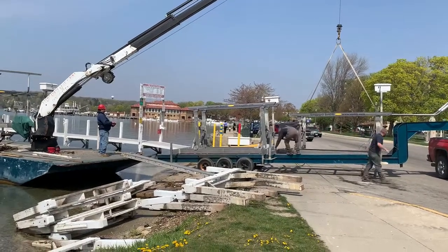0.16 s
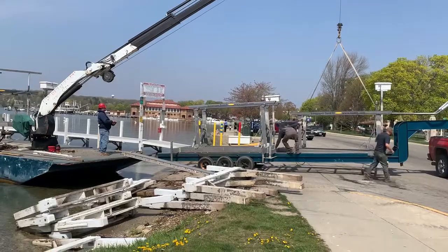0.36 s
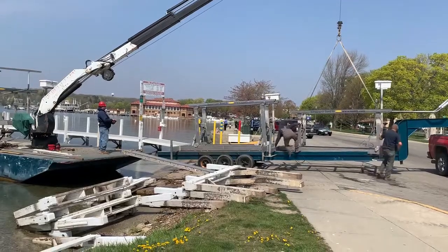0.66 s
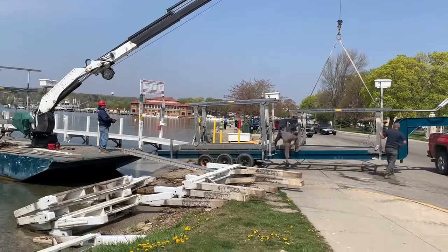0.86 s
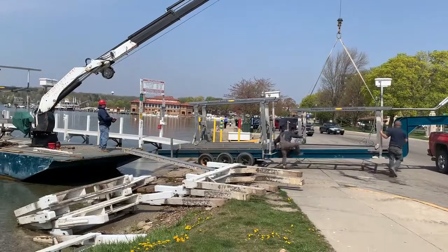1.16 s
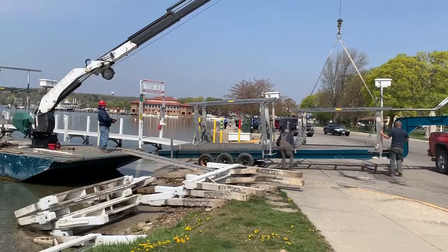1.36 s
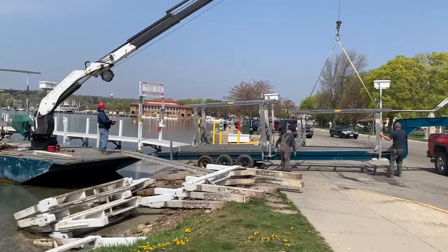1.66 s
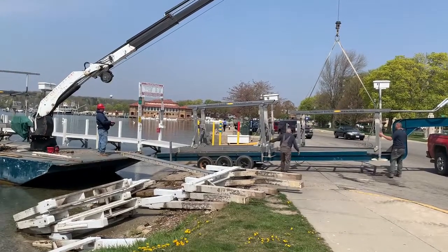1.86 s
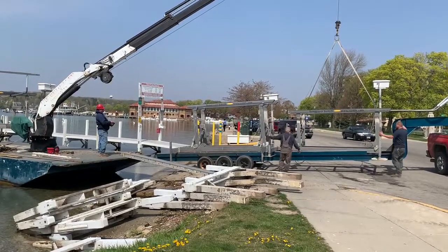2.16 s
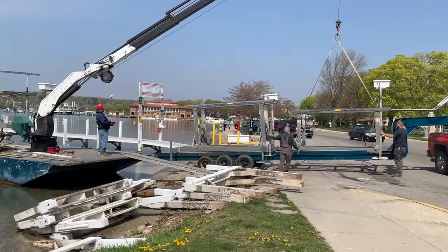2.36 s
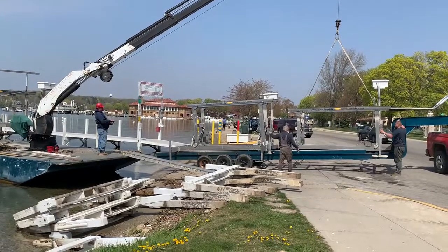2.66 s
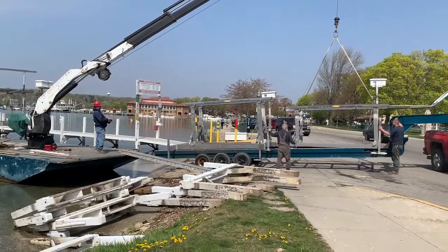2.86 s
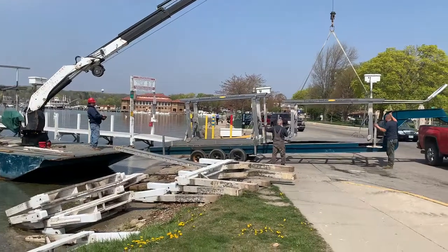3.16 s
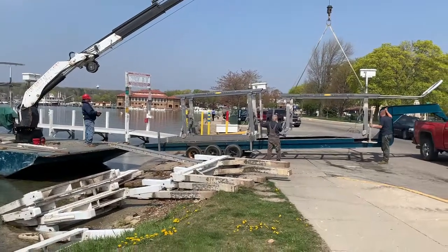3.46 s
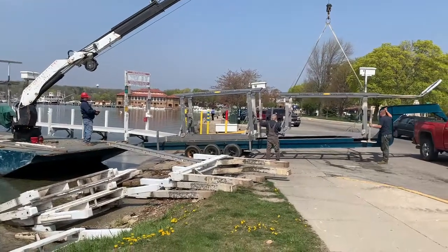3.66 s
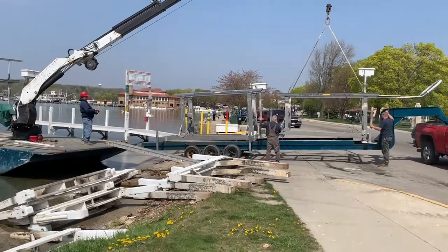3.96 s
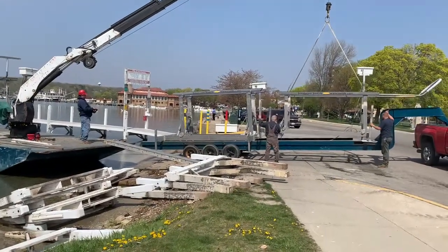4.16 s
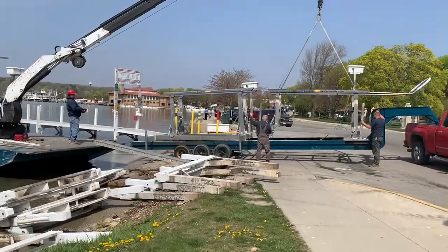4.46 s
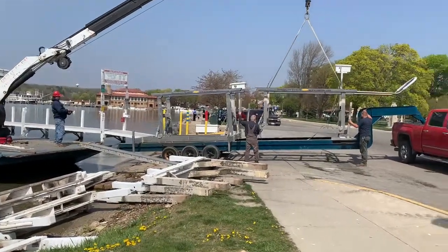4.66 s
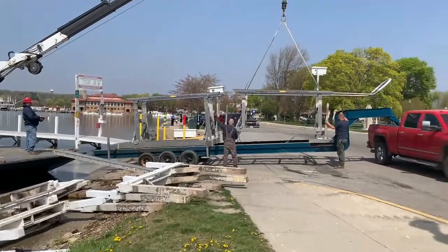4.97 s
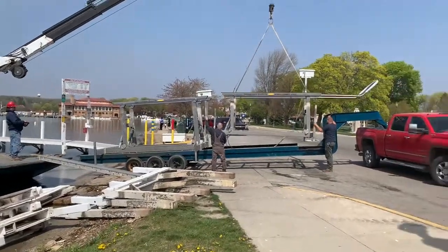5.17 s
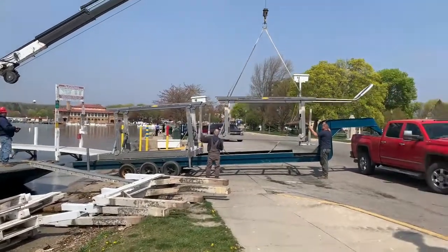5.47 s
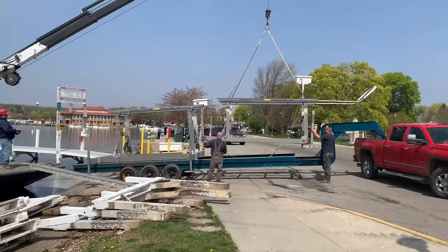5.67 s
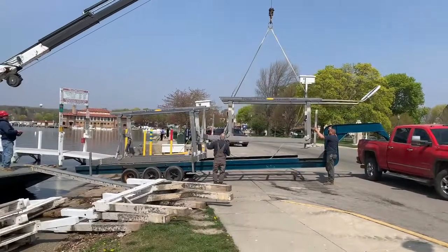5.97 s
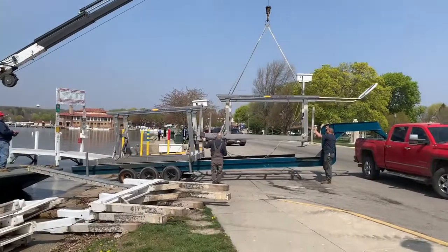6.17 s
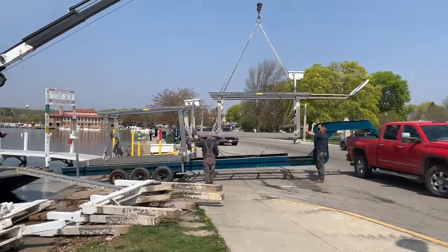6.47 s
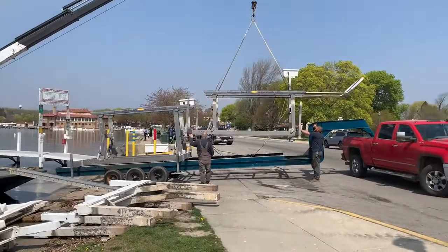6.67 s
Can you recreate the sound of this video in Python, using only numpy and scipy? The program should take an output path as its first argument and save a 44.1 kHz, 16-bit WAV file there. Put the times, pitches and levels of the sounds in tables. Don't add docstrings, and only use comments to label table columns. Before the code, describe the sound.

A mid-pitched pump whine rides on a low diesel hum and broad mechanical rush, briefly dipping near one second and growing fuller afterward. Light metal ticks and dull sling knocks precede a heavier bouncing frame clunk. Bright hard clanks follow while a car's road noise swells, with low boom and thumping exhaust at the end. Open-air wide stereo, moderate distance, little reverberation.

```python
import sys
import numpy as np
from scipy import signal
from scipy.fft import rfft, irfft, next_fast_len
from scipy.io import wavfile

SR = 44100
rng = np.random.default_rng(int(sys.argv[2]) if len(sys.argv) > 2 else 0)


def bounce(signal):
    frames = np.transpose(np.atleast_2d(signal))
    limited = np.clip(frames, -1, 1)
    pcm = np.round(limited * 32767).astype(np.int16)
    wavfile.write(sys.argv[1], SR, pcm)


def boost_factor(decibels):
    exponent = np.asarray(decibels, float) / 20
    return 10 ** exponent


N = 301203

# time_s, load_db (rms of second multiple), ripple_sharpness_db, tank_drumming_db
PUMP = [(0, -43, -7, 3.5), (.15, -38, -9, -7.5), (.87, -37.5, -2, -1.5), (.95, -58, 4.5, 10),
        (1.04, -42.5, -11, -3), (1.45, -41, -9, -5), (1.75, -39, -6, -21), (2.02, -35, -0.5, -10),
        (2.2, -33, -1.5, -1), (2.8, -33.5, -2, -1.5), (3.25, -34.5, -3.5, -1), (3.7, -37.5, -0.5, -11),
        (4.2, -36, -1, -3), (4.75, -35, -5, 0.5), (5.05, -34, -1, 0.5), (5.7, -38, 0.5, 1.5),
        (6.3, -43, 1, 1), (6.83, -49.5, 3.5, 15.5)]
# time_s, piston_rate_hz
SPEED = [(0, 265.6), (.31, 265.8), (.65, 265.1), (.88, 266.2), (.98, 263.5), (1.1, 266.4), (1.27, 266.8),
         (1.55, 266.2), (2.17, 264), (2.55, 263.9), (3.6, 265), (4.34, 264.3), (5.5, 264.9), (6.83, 265)]
# multiple, left_over_right_db, right_lag_rad
PUMP_TONES = [(1, -1.5, 0.31), (2, 5, 1.23), (3, 3, 0.15)]
# multiple, level_db (re the last PUMP_ANSWER row), drumming_share, right_lag_rad
PUMP_FAINT = [(7, -12, .01, 0.076), (10, -15.5, 0.93, 0.82), (11, -11.5, .01, -0.52)]
# mean_level_db, load_share, sharpness_share, drumming_share, waver_db
PUMP_ANSWER = [(-39.5, 0.55, .01, 1, 1.5), (-35, 0.89, .01, .01, 0.36), (-37, 0.66, 1.44, .01, -0.14),
               (-55.5, 1, 0.16, .01, 4)]
FLUTTER_DB, FLUTTER_GROWS_PER_S, STEADIEST_S = 1.5, 0.37, 2.5
# order, level_db (rms)
ORDERS_DB = [(3, -52), (4, -31.5), (5, -50), (6, -48), (7, -47.5), (8, -43), (10, -55.5), (11, -53.5),
             (12, -52.5), (15, -55), (16, -52.5), (18, -57), (20, -59)]
PISTONS_PER_ORDER, FIRING_ORDER = 14, 4
# time_s, level_db (re mean)
FIRING = [(0, -16), (.15, 5.5), (.5, -4), (.95, 1), (2.2, -3.5), (3.2, 0), (3.7, -2.5), (4.2, -5.5),
          (5.2, -3.5), (5.7, -1), (6.2, -9), (6.45, 9.5), (6.83, -10)]
# start_s, highest_db
FIRING_YIELDS = (6.2, -12)
# multiple (of piston rate), start_s, end_s, level_db (rms), right_lag_rad
WHINES = [(5, .4, .8, -55, 1.2), (5, 1.9, 3.3, -51.5, 1.2), (5, 3.5, 4.75, -54, 1.5),
          (4.857, .3, .85, -55, 1.1), (4.857, 1.8, 3.3, -54, 1.3), (4.857, 5.1, 5.8, -52.5, 1.8),
          (5.46, .1, 1.75, -56, 2.4), (4.66, .3, 1.0, -56, 1.0), (4, 1.45, 1.85, -57, .5),
          (4, 2.3, 3.55, -53, .3), (4, 4.0, 4.75, -53, .3), (4, 5.4, 6.2, -53, .3), (4, 6.4, 6.75, -54, .3),
          (10, 5.55, 6.08, -59, .3), (4.66, 6.35, 6.72, -51, 1.0)]
WHINE_FADE_DB_PER_S, WHINE_TRIM_DB = 83, 1.5

# frequency_hz, density_db (per Hz)
RUMBLE = [(15, -60), (27, -49.5), (50, 3.5), (81, 6.5), (119, -1), (155, 2), (203, -7), (252, -3.5),
          (450, -17), (580, -20), (990, -120)]
# frequency_hz, density_db (per Hz)
RUSH_COLOUR = [(250, 4.5), (400, -1), (900, 2), (1350, -2), (1900, -3.5), (2600, -11), (3300, -14.5),
               (4500, -18.5), (6500, -29), (8500, -42), (11500, -59), (14200, -31), (15100, -43),
               (15400, -73)]
# frequency_hz, likeness (0-1)
RUSH_ALIKE = [(60, 0.93), (350, 0.9), (800, 0.85), (1100, 0.26), (1700, 0.28), (2400, 1), (3400, 0.31),
              (5500, 0.45)]
# frequency_hz, width_hz, level_db, change_db_per_s
CASE = [(1288, 89, -2.5, 0.2), (2490, 196, -9.5, 1.86), (3100, 280, 2, -3), (2456, 45, -3, 0.3),
        (2620, 26, -2, 2.3), (2810, 45, -5, 2), (2900, 40, -1, 0)]
RUMBLE_DB, RUSH_DB, RUSH_FOLLOWS_LOAD, RUSH_RISE_DB_PER_S = -33, -37.5, 0.085, 0.26
TREBLE_FROM_HZ, TREBLE_FOLLOWS_LOAD = 2500, 0.35
CRANE_LAG_S = 13.07 / 44100
# start_s, end_s, pitch_hz, level_db
GROAN = (.08, .52, 214.5, -36)
GROAN_SAG_FROM_S, GROAN_SAG_HZ_PER_S = .24, 68
GROAN_IN_DB_PER_S, GROAN_OUT_DB_PER_S = 170, 280

# frequency_hz, level_db, width_hz, t60_s
FRAME = [(288.8, 4.5, 97, 0.39), (639, -0.5, 182, 0.24), (465, -3.5, 370, 0.42), (940, -6.5, 590, 0.5),
         (1900, -13, 1100, 0.26), (4330, -17.5, 3000, 0.32), (6520, -20, 4200, 0.25),
         (9800, -15, 2900, 0.12)]
# start_s, level_db, tilt_above_db_per_octave, tilt_below_db_per_octave
FRAME_BLOWS = [
    (3.214, -25, -6, -11),
    (3.227, -33.5, 2.5, 0),
    (3.245, -35, 1.5, -13),
    (3.262, -35, 0, -11),
    (3.284, -35, -1, -1),
]
# start_s, peak_db, pitch_hz, width_hz, t60_s
SIDE_KNOCKS = [
    (1.14, -29, 460, 40.4, 0.2),
    (3.472, -19, 670, 303, 0.063),
    (3.735, -25, 670, 150, 0.076),
]
# start_s, peak_db, pitch_hz, width_hz, t60_s
CLANKS = [(4.552, -33, 1880, 120, .05), (4.552, -31, 2450, 150, .05), (4.552, -40, 4230, 1500, .025),
          (4.9665, -26, 4330, 250, 0.024), (4.967, -30, 3540, 200, .035), (4.968, -26, 2050, 150, .04),
          (4.967, -27, 2570, 300, .05), (4.9665, -35, 7340, 500, .03), (4.9665, -36, 10700, 700, .022),
          (4.9665, -41, 5940, 1800, .025), (4.988, -24, 1900, 140, 0.044), (4.988, -29, 2500, 400, .02),
          (4.991, -27, 1690, 100, 0.046), (4.988, -37, 4060, 1500, 0.035), (6.1255, -28, 5370, 450, 0.025),
          (6.1255, -26, 1870, 100, .06), (6.128, -25, 2283, 100, 0.06), (6.128, -34, 2503, 120, .068),
          (6.126, -33, 1450, 200, .04), (6.1275, -30.5, 4260, 450, 0.057), (6.1255, -41, 6600, 600, .03),
          (6.1255, -39, 7450, 500, .02), (6.1255, -45, 11700, 800, .014), (6.1255, -43, 9600, 1500, .025),
          (6.1255, -48, 13800, 2500, .015), (6.144, -42, 4300, 400, .04), (6.144, -45, 6500, 1800, .04),
          (6.163, -39, 2120, 40, 0.21)]
# start_s, peak_db, pitch_hz, width_hz, t60_s
OPPOSED = [
    (4.552, -22, 1400, 250, .05),
    (4.552, -33, 3300, 250, .04),
    (4.552, -35, 1800, 300, .04),
    (4.967, -33, 2670, 300, .04),
    (4.967, -33, 3400, 300, .03),
    (4.989, -33, 1770, 300, .04),
    (6.126, -26, 2850, 200, .06),
    (6.126, -31, 1430, 200, .05),
    (6.126, -36, 3350, 300, .04),
]
# start_s, peak_db,
# pitch_hz, width_hz, t60_s
CRACKS = [(4.9665, -33, 3480, 5000, 0.015), (4.988, -35, 2440, 2500, .02), (6.1255, -35, 3690, 5500, 0.021),
          (6.132, -37, 4460, 4000, 0.043), (1.366, -45, 2000, 1500, 0.024), (1.436, -40, 1990, 1200, 0.043),
          (1.462, -44, 2200, 1500, .05), (4.003, -33, 1520, 300, .04), (3.235, -37.5, 1503, 2180, .2),
          (3.27, -39, 1417, 1990, 0.14), (5.86, -24, 289, 60, 0.14), (5.93, -19, 292, 60, 0.14)]
# start_s, peak_db, pitch_hz, width_hz, t60_s
DULL_KNOCKS = [(1.06, -35, 1650, 500, .035), (1.364, -27, 1700, 600, .022), (1.445, -36, 2450, 700, .035),
               (1.453, -33, 1800, 450, .035), (4.005, -24, 1600, 150, .016), (4.005, -27, 1250, 150, .02),
               (5.328, -25, 970, 150, .06), (5.6, -28, 930, 150, .06), (5.885, -31, 950, 150, .1),
               (6.055, -28, 940, 120, .07), (3.305, -22, 300, 40, .2), (3.238, -37, 2150, 500, .12),
               (3.242, -36, 1650, 400, .2), (3.285, -24, 250, 80, .12), (3.472, -24, 690, 60, .05)]
# start_s, peak_db, pitch_hz, width_hz, t60_s
CATCHES = [
    (1.05, -37, 1510, 200, .06),
    (1.058, -36, 1750, 200, .06),
    (1.35, -38, 1560, 150, .08),
    (1.358, -40, 1900, 200, .05),
    (1.42, -36, 1700, 150, .08),
    (1.44, -34, 1900, 200, .07),
    (1.443, -38.5, 2500, 150, 0.051),
    (1.17, -41, 1540, 80, 0.23),
    (5.385, -42, 5760, 2500, 0.3),
]
# start_s, peak_db, pitch_hz, width_hz, t60_s
SCUFFS = [
    (1.047, -48.5, 4800, 5000, 0.06),
    (1.057, -40, 2800, 3500, .06),
    (1.428, -51, 4170, 2500, .05),
    (1.444, -41, 2770, 2970, 0.16),
    (1.45, -56, 6540, 3000, 0.14),
]
SHACKLE_HZ = [1460, 1880, 2270, 3450, 4320, 5400, 6300, 7400, 8700, 10300, 11700, 13500]
# level_db, width_hz
SHACKLE = [(4, 330), (7.5, 180), (-2, 420), (2, 160), (-2, 860), (-11, 450), (-5, 1700), (-5, 2300),
           (5, 830), (-3, 1200), (-9.5, 2000), (-2, 2500)]
# start_s, peak_db, brightest_hz, loss_db_per_octave, t60_s
CLINK_BLOWS = [
    (0.417, -47, 6260, 7, 0.15),
    (1.589, -45, 9450, 15, .025),
    (1.811, -48, 11500, 23, .047),
    (2.2, -47.5, 6300, 21, 0.084),
    (3.858, -41, 8500, 15, 0.024),
    (4.551, -43, 9000, 12, 0.047),
    (5.6, -54, 7800, 27, .03),
    (5.711, -39, 10500, 7, 0.08),
]
REACH_OCTAVES = 1.7
# start_s, peak_db, pitch_hz, width_hz, t60_s
PINGS = [
    (5.009, -44, 12480, 200, .1),
    (5.71, -43, 11700, 200, .05),
    (5.7, -46, 5530, 400, .05),
]
# frequency_hz, level_db, width_hz, t60_s
LINK = [(10050, -1.5, 510, 0.26), (11200, 0, 4900, .05), (15500, 4, 300, .11)]
# start_s, level_db
LINK_TOUCHES = [
    (.312, -56),
    (.338, -54),
    (.453, -56),
    (.545, -55),
    (1.088, -57),
    (1.118, -66),
]
# start_s, peak_db, pitch_hz
THUMPS = [
    (6.32, -19, 70),
    (6.405, -13, 74),
    (6.432, -18, 74),
    (6.459, -18, 98),
    (6.499, -16, 74),
    (6.513, -14, 92),
    (6.6, -19, 78),
    (6.71, -17, 85),
    (6.735, -18, 110),
]
THUMP_WIDTH_HZ, THUMP_T60_S = 2, .25

# time_s, roar_db
VEHICLE = [(4.2, -77), (4.6, -41), (4.8, -35), (5.15, -29.5), (5.502, -28), (5.9, -28), (6.5, -24.5),
           (6.7, -25.5), (6.83, -27)]
# frequency_hz, density_db (per Hz)
BOOM = [(25, -36), (45, -1.5), (75, -5), (120, 1.5), (180, -7.5), (270, -34), (400, -59)]
BOOM_DB, BOOM_RISE_DB_PER_S, BOOM_TOP_DB, BOOM_THROB_DB = -44, 5.5, -13, 5.5
# frequency_hz, density_db (per Hz)
ROAR = [(150, -11), (290, 17), (450, 13.5), (900, 9.5), (1300, 8), (2000, 5), (2700, -11.5), (3800, -9.5),
        (5000, -15.5), (7500, -27), (11000, -48.5)]
# frequency_hz, likeness (0-1)
ROAR_ALIKE = [(100, .9), (300, .85), (700, .5), (1100, .9), (1850, .92), (2400, .5), (3500, .2), (5500, .4),
              (7000, .3)]
# frequency_hz, right_lead_rad
ROAR_LEAD = [(50, -.9), (150, -2.3), (300, -4.6), (1000, -3.6), (2050, -3.3), (2700, -5.3), (3400, -4.2),
             (5500, -6), (7000, -6)]
ECHO_S, ECHO_GROWS_S_PER_S, ECHO_DB, ECHO_FROM_HZ = .00046, -.00003, -7, 2600
NEAREST_S = 5.5
# start_s, end_s, centre_hz, width_hz, removed_share, fade_db_per_s
GROUND_DIP = (5.52, 5.4, 1740, 620, 0.63, 22)
# loudest_s, level_db, rise_db_per_s, fall_db_per_s
ENGINE_NOTE = (5.5, -30, 31.5, 60)
NOTE_HZ, NOTE_SAG_HZ_PER_S = 282, 4.6
ROUND_DB = 6

# frequency_hz, density_db (per Hz)
GRIT_COLOUR = [(3000, -38), (5000, -21), (7000, -11), (8500, 6.5), (10500, -3), (12500, -6), (14800, -5.5),
               (15600, -32)]
# frequency_hz, density_db (per Hz)
SPRAY_COLOUR = [(2500, -9), (4500, -10), (7000, 2), (8500, -22)]
SPRAY_DB = -4.5
# time_s, hiss_db
TYRE_HISS = [(4.2, -83), (4.44, -77), (4.97, -61.5), (5.14, -60), (5.31, -56), (5.6, -60), (6.18, -72),
             (6.4, -79)]
TYRE_TRIM_DB = 5.5
AIR_DB, AIR_RISE_DB_PER_S, AIR_WAVER_DB = -68.5, 0.3, .6
# centre_s, change_db, half_width_s
AIR_LULLS = [
    (0.0, -3, 0.19),
    (1.1, -4, 0.34),
    (6.25, -13, 0.29),
]
# start_s, end_s, change_db
TOP_LULLS = [
    (-.1, .25, -14),
    (.95, 1.68, -6),
    (6.33, 6.45, -20),
]
TOP_HISS_FROM_HZ = 13200
CUTOFF_HZ, TOP_FROM_HZ, TOP_IN_STEP_HZ, TOP_TURN_HZ = 15750, 7000, 10980, 4570


def pump_and_diesel():
    load_db, sharp_db, drum_db = in_time(PUMP)
    swing_db = load_db - load_db.mean()
    turns = np.cumsum(in_time(SPEED)[0]) / SR
    levels_db = [db + load * swing_db + sharp * sharp_db + drum * drum_db
                 for db, load, sharp, drum, _ in PUMP_ANSWER]
    unsteadiness = FLUTTER_GROWS_PER_S * abs(np.arange(N) / SR - STEADIEST_S)
    out = np.zeros((2, N))
    for (multiple, pan_db, lag), level_db, answer in zip(PUMP_TONES, levels_db, PUMP_ANSWER):
        waver = wobble(answer[-1], rate=2.25) * wobble(FLUTTER_DB, rate=14.0) ** unsteadiness
        out += waver * tone(multiple * turns, level_db, pan_db, lag)
    for multiple, rel_db, drum, lag in PUMP_FAINT:
        level_db = levels_db[-1] + 1.5 + rel_db + drum * drum_db
        out += wobble(5.8, rate=7.8) * tone(multiple * turns, level_db, 0, lag)
    for order, level_db in ORDERS_DB:
        if order == FIRING_ORDER:
            start, highest_db = FIRING_YIELDS
            ceiling_db = highest_db - span_db(start, N, 150)
            swell = boost_factor(np.minimum(in_time(FIRING)[0], ceiling_db)) * wobble(0.63, rate=0.56)
        else:
            swell = wobble(3.7, rate=0.67)
        out += swell * tone(order * turns / PISTONS_PER_ORDER, level_db, -0.89, 0.072 * order)
    return out


def whines():
    turns = np.cumsum(in_time(SPEED)[0]) / SR
    out = np.zeros((2, N))
    for multiple, start, end, db, lag in WHINES:
        level_db = db + WHINE_TRIM_DB + span_db(start, end, WHINE_FADE_DB_PER_S)
        out += wobble(3.0, rate=4.8) * tone(multiple * turns, level_db, 2.8, lag)
    return out


def crane_rush():
    t, load_db = np.arange(N) / SR, in_time(PUMP)[0]
    swing_db = load_db - load_db.mean()
    rush_db = RUSH_DB + RUSH_FOLLOWS_LOAD * swing_db + RUSH_RISE_DB_PER_S * t

    def late(hz):
        return -2 * np.pi * hz * CRANE_LAG_S

    rumble = spaced_noise(RUMBLE, RUSH_ALIKE, lambda hz: 0.17 * late(hz) - .45, patchy_db=3.5)
    flow = spaced_noise(RUSH_COLOUR, RUSH_ALIKE, late, patchy_db=.8, grain_db=-0.16)
    rush = flow.copy()
    for hz, width_hz, db, change in CASE:
        rush += boost_factor(db + change * t) * signal.lfilter(*signal.iirpeak(hz, hz / width_hz, fs=SR), flow)
    treble = signal.sosfilt(signal.butter(2, TREBLE_FROM_HZ, "high", fs=SR, output="sos"), rush)
    rush += (boost_factor(TREBLE_FOLLOWS_LOAD * np.maximum(swing_db, -6)) - 1) * treble
    return (boost_factor(RUMBLE_DB) * rumble + boost_factor(rush_db) * rush) * boost_factor([[-.7], [.7]])


def groan():
    t, (start, end, hz, db) = np.arange(N) / SR, GROAN
    rise_db = GROAN_IN_DB_PER_S * (t - start - .07)
    fall_db = GROAN_OUT_DB_PER_S * (end - .07 - t)
    level_db = db + np.minimum(0, np.minimum(rise_db, fall_db))
    pitch_hz = hz - GROAN_SAG_HZ_PER_S * np.clip(t - GROAN_SAG_FROM_S, 0, 1)
    return tone(np.cumsum(pitch_hz) / SR, level_db, -3.5, 1.24)


def knock_rows():
    rows = []
    for s, db, up_db, down_db in FRAME_BLOWS:
        for hz, mode_db, width_hz, t60 in FRAME:
            octave = np.log2(hz / FRAME[1][0])
            tilt_db = up_db * max(octave, 0) + down_db * max(-octave, 0)
            rows.append((s, db + mode_db + tilt_db, hz, width_hz, t60))
    return rows


def clink_rows():
    rows = []
    for s, db, top_hz, loss_db, t60 in CLINK_BLOWS:
        for hz, (mode_db, width_hz) in zip(SHACKLE_HZ, SHACKLE):
            away = abs(np.log2(hz / top_hz))
            if away < REACH_OCTAVES:
                rows.append((s, db + mode_db - loss_db * away, hz, width_hz, t60 * (top_hz / hz) ** 0.34))
    for s, db in LINK_TOUCHES:
        rows += [(s, db + mode_db, hz, width_hz, t60) for hz, mode_db, width_hz, t60 in LINK]
    return rows + PINGS


def strike(hz, width_hz, t60, clean_share):
    t = np.arange(round(np.clip(t60, .004, .3) * SR)) / SR
    noise = rng.standard_normal((2, len(t) + 1000))
    slow = signal.sosfilt(signal.butter(3, width_hz / 2, fs=SR, output="sos"), noise)[:, 1000:]
    along, across = rms_one(slow) * (1 - clean_share)
    carrier = 2 * np.pi * hz * t
    contact_s = .0005 + .8 / hz
    rise = np.sin(np.pi / 2 * np.minimum(1, t / contact_s)) ** 2
    ring = (clean_share + along) * np.sin(carrier) + across * np.cos(carrier)
    return ring * boost_factor(-60 * t / max(t60, .004)) * rise


def metal_hits(rows, lag_s, pan_db, clean_share):
    out = np.zeros(N + SR)
    for s, db, hz, width_hz, t60 in rows:
        clean = np.clip(clean_share * np.exp(-4.0 * width_hz / hz), 0, 1)
        ring = strike(hz, width_hz, t60, clean)
        out[round(s * SR):][:len(ring)] += boost_factor(db) * ring
    right = np.roll(out, round(lag_s * SR))
    return np.array([out[:N], right[:N]]) * boost_factor([[pan_db / 2], [-pan_db / 2]])


def all_hits():
    thumps = [(s, db, hz, THUMP_WIDTH_HZ, THUMP_T60_S) for s, db, hz in THUMPS]
    hits = metal_hits(knock_rows(), lag_s=.00005, pan_db=-3.0, clean_share=0.65)
    hits += metal_hits(SIDE_KNOCKS, lag_s=-.0007, pan_db=-3.5, clean_share=.7)
    hits += metal_hits(thumps, lag_s=-.001, pan_db=-2.0, clean_share=1.1)
    hits += metal_hits(clink_rows() + SCUFFS, lag_s=-.00003, pan_db=-2.0, clean_share=.7)
    hits += metal_hits(CLANKS, lag_s=-.00003, pan_db=-2.0, clean_share=1.0)
    hits += metal_hits(DULL_KNOCKS, lag_s=.0001, pan_db=1.0, clean_share=2.0)
    hits += metal_hits(CRACKS, lag_s=-.00003, pan_db=-1.5, clean_share=1.0)
    hits += metal_hits(OPPOSED, lag_s=0, pan_db=-2.0, clean_share=1.5) * [[1], [-1]]
    hits += metal_hits(CATCHES, lag_s=.00005, pan_db=-1.0, clean_share=1.1)
    return hits


def vehicle():
    roar_db, = in_time([(0.019, -101)] + VEHICLE)
    since_first_s = np.arange(N) / SR - VEHICLE[0][0]
    boom_db = np.minimum(BOOM_TOP_DB, BOOM_DB + BOOM_RISE_DB_PER_S * since_first_s)
    boom = wobble(BOOM_THROB_DB, rate=1.45) * spaced_noise(BOOM, [(40, 1.0), (200, 0.96)], roar_lead,
                                                           patchy_db=3.0)
    roar = spaced_noise(ROAR, ROAR_ALIKE, roar_lead, patchy_db=1.8, grain_db=1.5)
    return (boost_factor(boom_db) * boom + boost_factor(roar_db) * road_echo(roar)) * boost_factor([[-.6], [.6]])


def roar_lead(hz):
    return at_hz(ROAR_LEAD, hz)


def road_echo(x):
    at = np.arange(N)
    lag = SR * (ECHO_S + ECHO_GROWS_S_PER_S * (at / SR - NEAREST_S))
    treble = signal.sosfilt(signal.butter(2, ECHO_FROM_HZ, "high", fs=SR, output="sos"), x)
    return x + boost_factor(ECHO_DB) * np.array([np.interp(at - lag, at, side) for side in treble])


def engine_note():
    level_db = peaked(*ENGINE_NOTE)
    pitch_hz = NOTE_HZ - NOTE_SAG_HZ_PER_S * (np.arange(N) / SR - ENGINE_NOTE[0])
    turns = np.cumsum(pitch_hz) / SR
    note = wobble(5.6, rate=39.0) * tone(turns, level_db, -2.5, 0.64)
    return note + wobble(3.1, rate=9.6) * tone(turns / 2, level_db + 0.5, -2.2, 2.6)


def grit():
    hiss = spaced_noise(GRIT_COLOUR, [(1000, .5), (9000, .3)], lambda hz: 0 * hz, patchy_db=.9, grain_db=1.5)
    spray = spaced_noise(SPRAY_COLOUR, ROAR_ALIKE, roar_lead, patchy_db=1.5, grain_db=1.0)
    t = np.arange(N) / SR
    air_db = AIR_DB + AIR_RISE_DB_PER_S * t
    for s, db, half in AIR_LULLS:
        air_db += db * np.exp(-((t - s) / half) ** 2)
    tyres = boost_factor(in_time([(3.8, -93)] + TYRE_HISS + [(6.83, -87)])[0] + TYRE_TRIM_DB)
    return (wobble(AIR_WAVER_DB, rate=2.0) * boost_factor(air_db) + tyres) * hiss + boost_factor(SPRAY_DB) * tyres * spray


def top_lulls(x):
    top = signal.sosfiltfilt(signal.butter(6, TOP_HISS_FROM_HZ, "high", fs=SR, output="sos"), x)
    lull_db = sum(db * boost_factor(span_db(start, end, 400)) for start, end, db in TOP_LULLS)
    return x - (1 - boost_factor(lull_db)) * top


def ground_dip(x):
    start, end, hz, width_hz, share, fade = GROUND_DIP
    common = signal.lfilter(*signal.iirpeak(hz, hz / width_hz, fs=SR), x.mean(axis=0))
    return x - np.clip(share, 0, 1) * boost_factor(span_db(start, end, fade)) * common


def tone(turns, level_db, pan_db, lag):
    phase = 2 * np.pi * (turns + rng.random()) - [[0], [lag]]
    return np.sqrt(2) * boost_factor(level_db) * boost_factor([[pan_db / 2], [-pan_db / 2]]) * np.sin(phase)


def spaced_noise(colour, alike, lead, patchy_db, grain_db=0):
    size = next_fast_len(N)
    hz = np.arange(size // 2 + 1) * SR / size
    inside = (hz > colour[0][0] / 2) & (hz < colour[-1][0] * 1.4)
    grains = boost_factor(grain_db * rng.exponential(1, (2, size)))
    shared, own = rfft(rng.standard_normal((2, size)) * grains) * boost_factor(at_hz(colour, hz)) * inside
    share = np.clip(at_hz(alike, hz), 0, 1)
    right = share * shared * np.exp(1j * lead(hz)) + np.sqrt(1 - share ** 2) * own
    pair = np.array([shared, right])
    low, high = np.ceil(np.log2(colour[0][0])), np.floor(np.log2(colour[-1][0]))
    out, octave = 0, np.clip(np.log2(hz + 1), low, high)
    for centre in np.arange(low, high + 1):
        band = np.clip(1 - abs(octave - centre), 0, 1)
        out = out + wobble(patchy_db, rate=8.6) * irfft(pair * band, size)[:, :N]
    return rms_one(out)


def wobble(depth_db, rate):
    r = np.exp(-80 * np.pi * rate / SR)
    slow = signal.lfilter([1], [1, -2 * r, r * r], rng.standard_normal(N // 40 + 2002))[2000:]
    return np.interp(np.arange(N) / 40, np.arange(len(slow)), boost_factor(depth_db * rms_one(slow)))


def peaked(s, db, rise, fall):
    t = np.arange(N) / SR - s
    return db - ROUND_DB * np.logaddexp(-rise * t / ROUND_DB, fall * t / ROUND_DB)


def span_db(start, end, fade):
    t = np.arange(N) / SR
    return fade * np.minimum(0, np.minimum(t - start, end - t))


def in_time(rows):
    s, *columns = np.transpose(rows)
    return [np.interp(np.arange(N) / SR, s, column) for column in columns]


def at_hz(points, hz):
    table_hz, values = np.transpose(points)
    return np.interp(np.log(hz + 1), np.log(table_hz), values)


def rms_one(x):
    return x / np.sqrt(np.mean(x ** 2) + 1e-20)


def scene():
    tones = pump_and_diesel() + whines() + groan() + engine_note()
    noises = ground_dip(vehicle() + top_lulls(crane_rush() + grit()))
    return tones + noises + all_hits()


def band_limit(x):
    return signal.sosfilt(signal.butter(12, 16710, fs=SR, output="sos"), x)


def record(dry):
    size = next_fast_len(N)
    hz = np.arange(size // 2 + 1) * SR / size
    left, right = rfft(dry, size) * (hz < CUTOFF_HZ)
    top = np.clip((hz - TOP_FROM_HZ) / 800 + .5, 0, 1)
    turned = left * np.exp(2j * np.pi * (hz - TOP_IN_STEP_HZ) / TOP_TURN_HZ)
    right = np.sqrt(1 - top ** 2) * right + top * turned
    mix = irfft([left, right], size)[:, :N]
    return band_limit(mix)


dry = scene()
out = record(dry)
bounce(out)
```